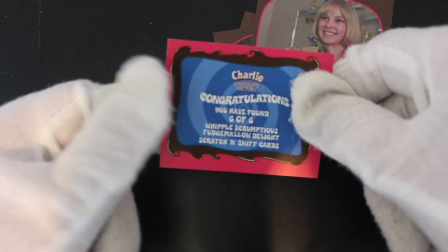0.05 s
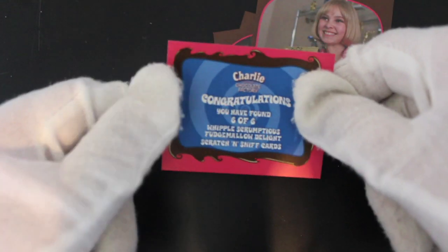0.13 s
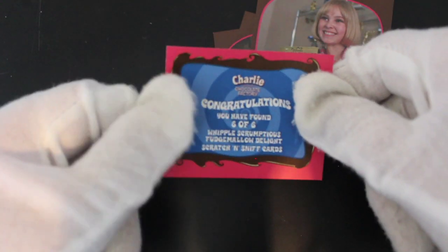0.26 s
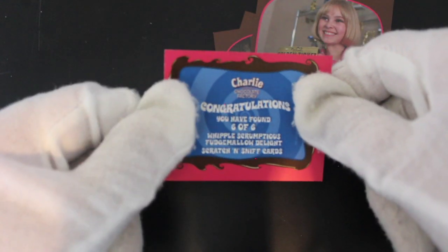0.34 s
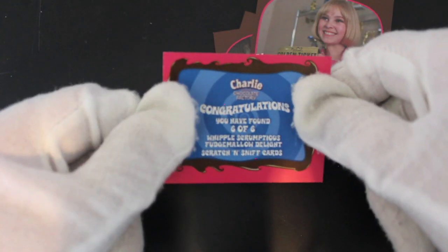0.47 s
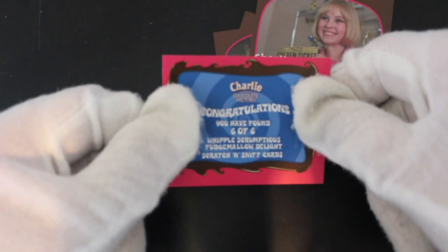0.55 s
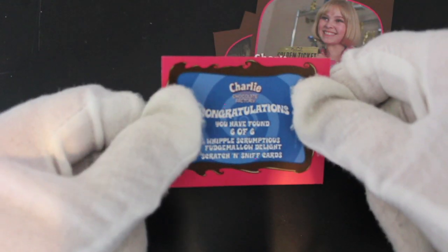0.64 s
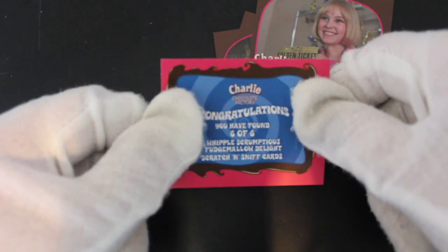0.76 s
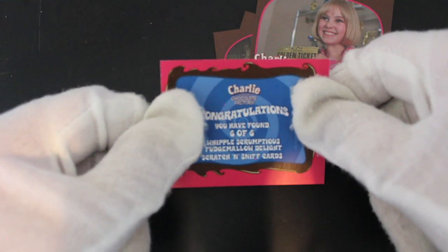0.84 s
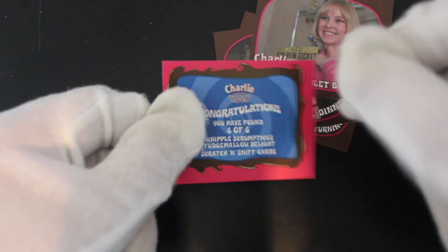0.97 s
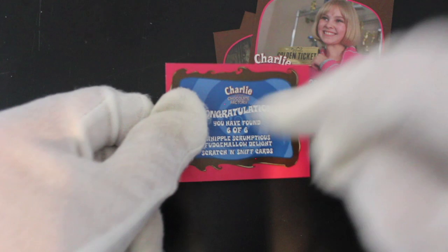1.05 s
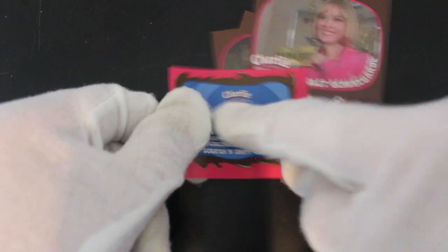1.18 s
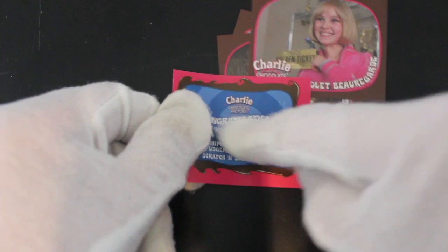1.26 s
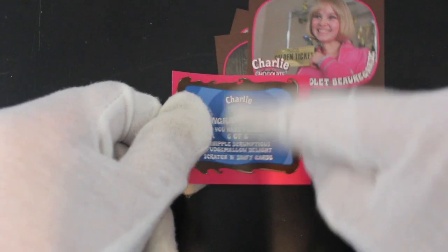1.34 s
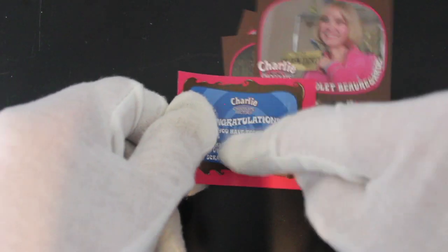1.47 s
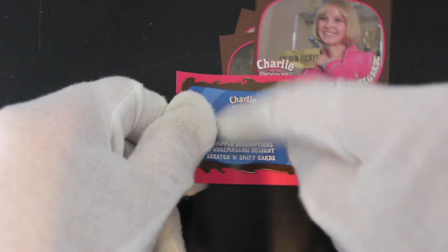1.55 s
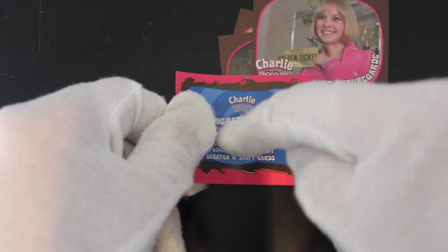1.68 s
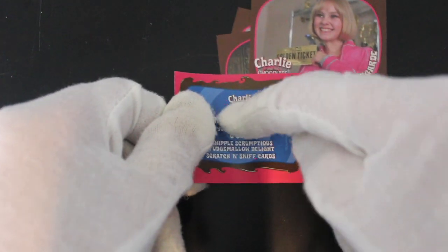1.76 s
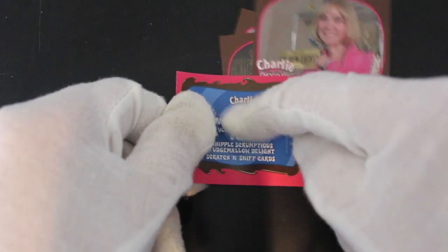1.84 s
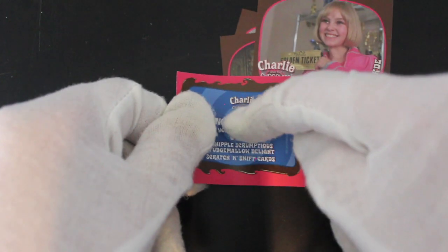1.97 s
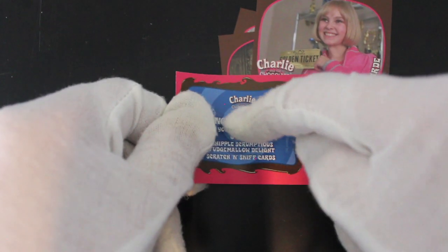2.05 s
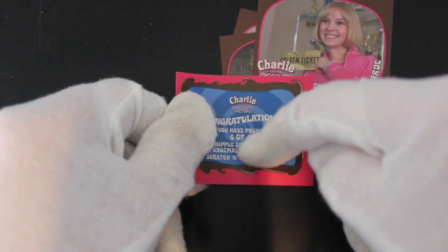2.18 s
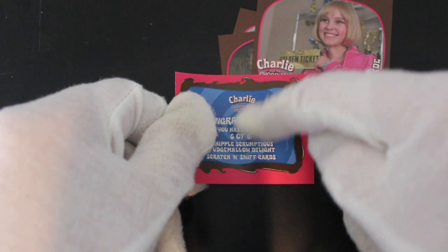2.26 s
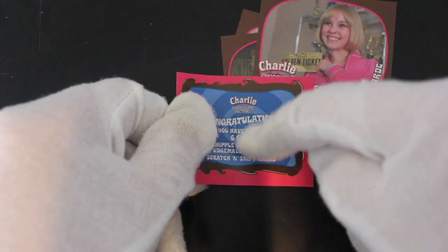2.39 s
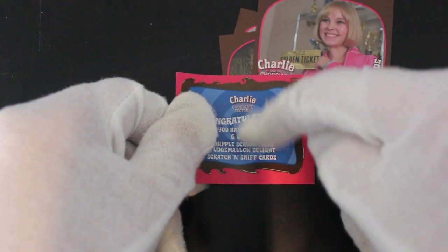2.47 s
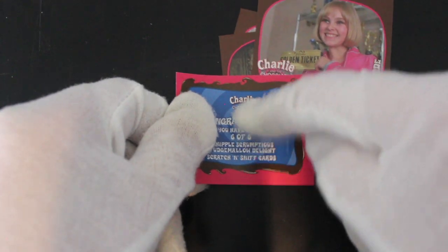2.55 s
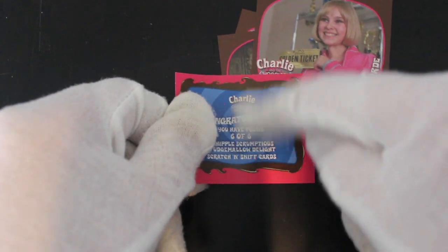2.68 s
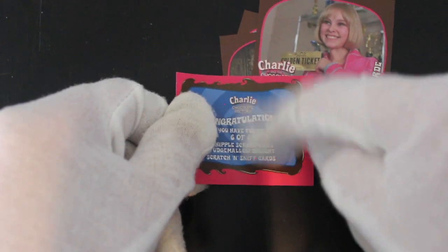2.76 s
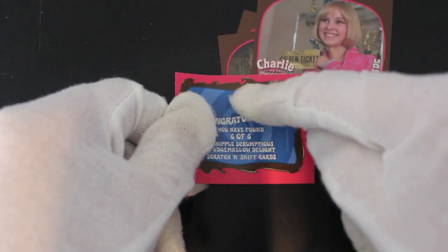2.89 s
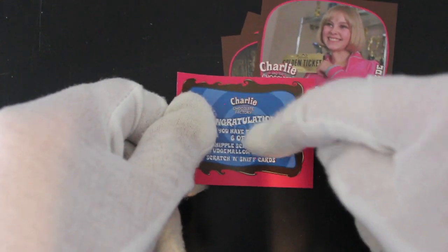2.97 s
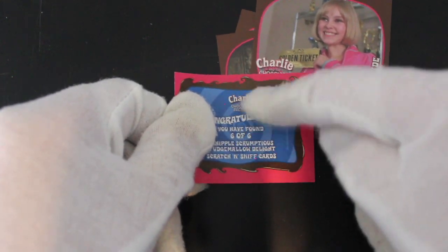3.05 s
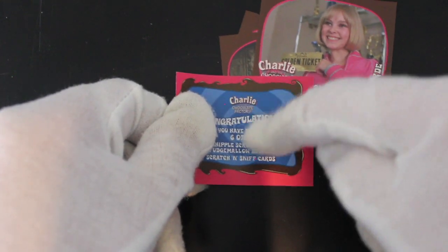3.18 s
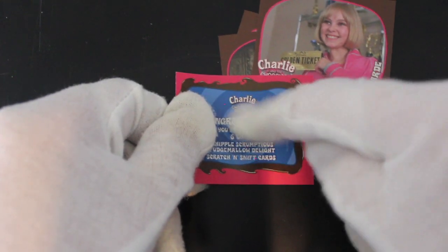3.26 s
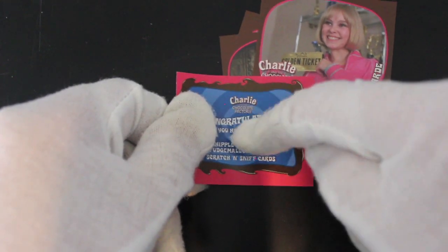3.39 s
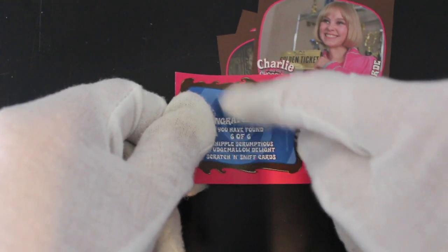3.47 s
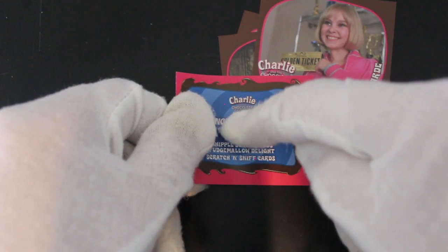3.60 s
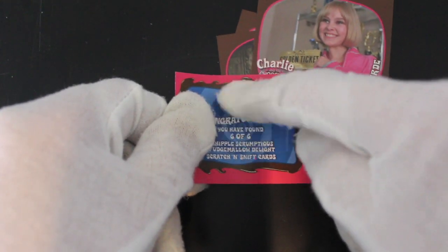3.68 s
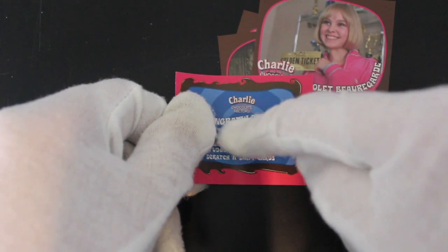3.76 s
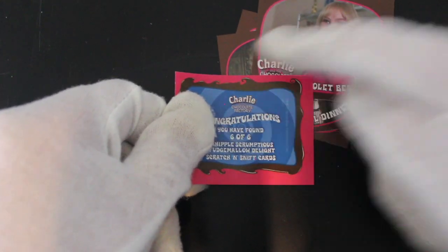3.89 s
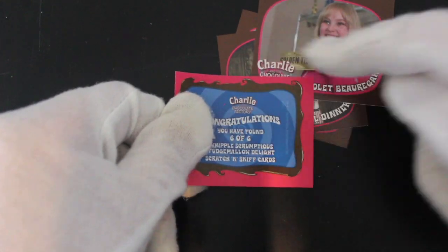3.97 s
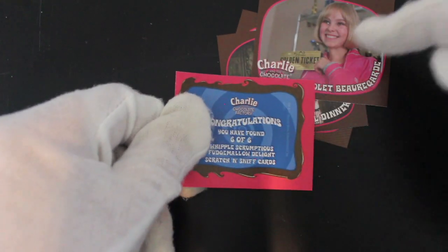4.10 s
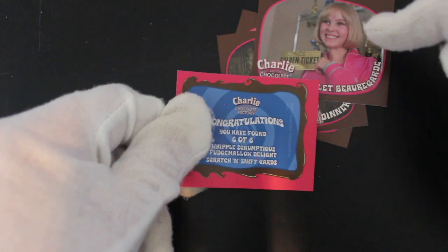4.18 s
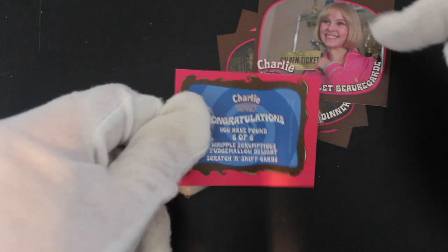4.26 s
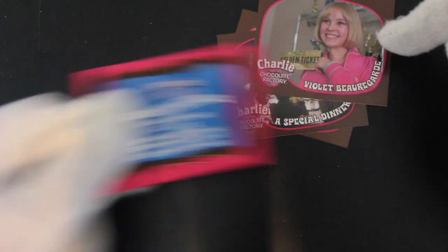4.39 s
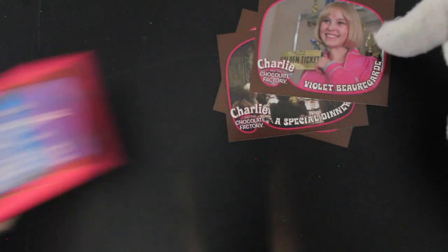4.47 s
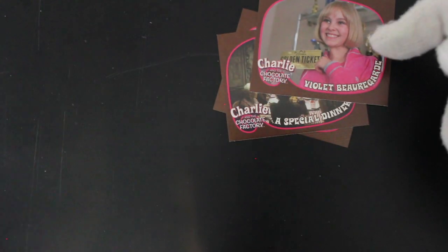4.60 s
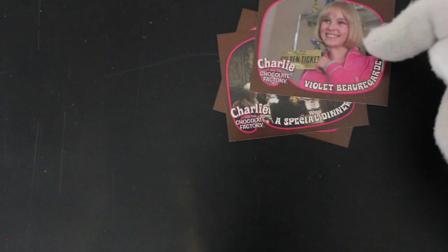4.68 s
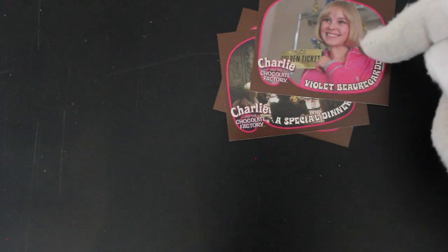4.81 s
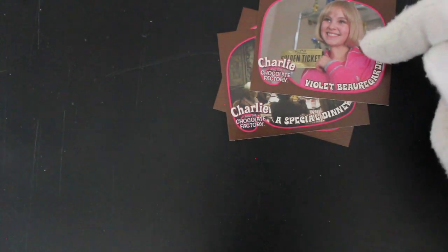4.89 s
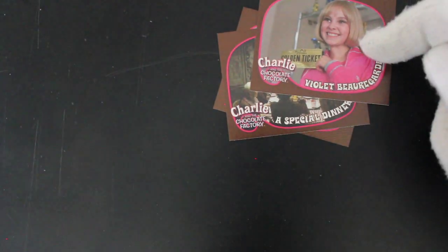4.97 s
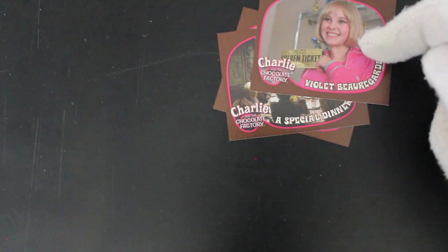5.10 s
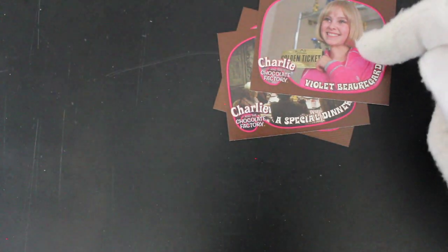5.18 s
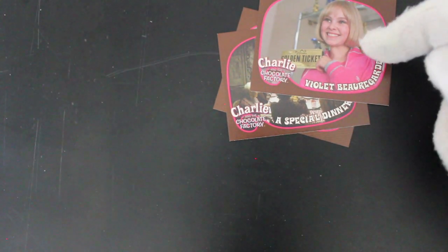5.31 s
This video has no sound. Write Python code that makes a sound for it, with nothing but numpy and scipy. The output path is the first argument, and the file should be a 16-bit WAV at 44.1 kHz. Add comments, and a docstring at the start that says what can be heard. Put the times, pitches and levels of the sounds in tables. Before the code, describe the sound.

The sound opens with quiet room noise and a faint shifting of cloth, close to a stereo microphone. At about 1.1 seconds a glove brushes a small card, followed by a few light taps. From 1.4 seconds a gloved fingertip scratches quickly to and fro, about ten strokes a second, each a soft, high cotton hiss with a slight rasp. There is a short break just after 2 seconds, then the strokes resume. From about 2.8 to 4 seconds the nail bites through the cloth, adding sharper rasps and tiny squeaks, clearest near 3.4 and 3.7 seconds. Low rumble and dull bumps from the hands run underneath, strongest near 1.4 and 2.8 seconds. The scratching stops at about 4 seconds. At 4.5 seconds the card is drawn away with a soft brush and tick, and gloves and sleeves rustle faintly, with a soft thud, until about 5.3 seconds.

```python
"""A gloved finger scratches to and fro, about ten strokes a second, on a small card held over a desk.
Stick-slip friction drives the sound: the cotton weave hisses on every stroke, and where the nail bites
through the cloth the card rasps and rings in its modes, with a few light taps and short squeaks.
The hands shake the nearby stereo microphone a little. At the end the card is drawn away,
and gloves and sleeves rustle in the quiet room."""
import sys
import numpy as np
from scipy import signal
from scipy.fft import rfft, irfft
from scipy.io import wavfile
from scipy.ndimage import uniform_filter1d

SR = 44100
rng = np.random.default_rng(int(sys.argv[2]) if len(sys.argv) > 2 else 0)


def dump_mix(stems):
    """Bounce the given channels to the path in sys.argv[1] as a 16-bit WAV at rate SR."""
    frames = np.atleast_2d(stems).T  # one column per channel
    limited = np.clip(frames, -1, 1)  # hard clip at full scale
    pcm = np.round(limited * 32767).astype(np.int16)
    wavfile.write(sys.argv[1], SR, pcm)


N = 235494


def from_db(db):
    """Amplitude ratio of a level in decibels."""
    return 10 ** (np.asarray(db) / 20)


def unit_rms(x):
    """Normalisation to unit mean power."""
    return x / np.sqrt(np.mean(x ** 2) + 1e-20)


def in_time(rows):
    """Linear interpolation of (time, values...) rows: one curve per value column."""
    times, *columns = np.transpose(rows)
    return [np.interp(np.arange(N) / SR, times, column) for column in columns]


def per_bin(points):
    """Interpolation of (frequency, value) rows over log frequency, at every spectral bin."""
    hz, value = np.transpose(points)
    return np.interp(np.log(np.arange(N // 2 + 1) * SR / N + 1), np.log(hz), value)


def coloured(x, spectrum):
    """Spectral shaping of a stationary noise; rms 1."""
    return unit_rms(irfft(rfft(x) * from_db(per_bin(spectrum)), N))


def low_pass(x, hz, order):
    """Butterworth low-pass filter."""
    return signal.sosfilt(signal.butter(order, min(hz, .45 * SR), fs=SR, output="sos"), x)


def drift(hz):
    """Random fluctuation: Gaussian noise through two low-pass poles; rms 1."""
    r = np.exp(-2 * np.pi * hz / SR)
    return unit_rms(signal.lfilter([1], [1, -2 * r, r * r], rng.standard_normal(N + SR))[SR:])


def resonate(x, modes):
    """Modal superposition: damped resonators in parallel share one driving force."""
    out = 0
    for hz, bandwidth, db in modes:
        r = np.exp(-np.pi * bandwidth / SR)
        poles = [1, -2 * r * np.cos(2 * np.pi * hz / SR), r * r]
        out = out + from_db(db) * (1 - r * r) / 2 * signal.lfilter([1, 0, -1], poles, x + 1e-18)
    return out


def slips(per_s, spread_db):
    """Stick-slip friction as a Poisson train of impulses of uneven size; rms 1."""
    sizes = from_db(spread_db * np.minimum(rng.exponential(1, N), 4))
    return unit_rms(sizes * rng.choice([-1, 1], N) * (rng.random(N) < per_s / SR))


def steady(x, span_s):
    """Division by the running rms holds the power even, as under a constant force."""
    return x / np.sqrt(np.abs(uniform_filter1d(x ** 2, max(int(span_s * SR), 2))) + 1e-12)


def swell(start, peak, end, sharpness):
    """Sine-power envelope of a movement that speeds up to its peak and slows to rest."""
    gain = np.zeros(N)
    at = np.arange(int(start * SR), min(int(end * SR), N))
    progress = np.interp(at / SR, [start, peak, end], [0, .5, 1])
    gain[at] = np.abs(np.sin(np.pi * progress)) ** sharpness
    return gain


def swells(rows, peak_share, sharpness):
    """Incoherent addition: (time, duration, levels...) swells sum in power, one gain per level column."""
    power = 0
    for start, length, *levels in rows:
        envelope = swell(start, start + peak_share * length, start + length, sharpness)
        power = power + np.outer(from_db(levels), envelope) ** 2
    return np.sqrt(power)


def linger(gain, decay_s):
    """Damping: the power of an envelope dies away exponentially."""
    r = np.exp(-1 / (decay_s * SR))
    return np.sqrt(signal.lfilter([1 - r], [1, -r], gain ** 2 + 1e-18))


# background spectrum of the room: (frequency [Hz], relative level [dB])
ROOM_SPECTRUM = [(76, -49), (130, 1.5), (194, -7.5), (219, -10.5), (257, -4.5), (295, -12.5), (340, -12.5),
                 (399, -13.5), (432, -14.5), (1080, -22), (1220, -23), (1820, -26), (15500, -29.5)]


def room_noise(level_db):
    """Ambient noise: a faint stationary hiss, uncorrelated between the channels."""
    return from_db(level_db) * coloured(rng.standard_normal((2, N)), ROOM_SPECTRUM)


# movement of the hands: (time [s], level [dB])
HAND_MOTION = [(0, -59.5), (.25, -51), (.38, -61), (1.1, -59.5), (1.45, -41.5), (2.3, -51), (2.95, -40.5),
               (3.3, -44), (3.8, -43.5), (4.15, -52), (4.45, -54), (4.65, -55.5), (5.34, -58)]
# the hands bumping the desk: (peak time [s], rumble level [dB], thud level [dB])
DESK_BUMPS = [(1.41, -34.5, -56), (1.61, -44, -76), (1.86, -42.5, -64), (2.08, -44.5, -59.5),
              (2.34, -53, -53), (2.43, -42, -63), (2.581, -38, -63), (2.798, -33, -47), (3.079, -40, -54.5),
              (4.52, -55, -55), (4.95, -75, -55.5), (5.079, -62, -50)]
# two spectra of the shaken microphone: (frequency [Hz], relative level [dB])
RUMBLE_SPECTRUM = [(5, -11), (10, 12), (18, 14.5), (27, 5), (38, 9.5), (52, 4), (62, -3.5), (75, -7.5),
                   (110, -59.5)]
THUD_SPECTRUM = [(50, -13), (75, -17), (92, -9.5), (115, -8.5), (140, -20.5), (190, -27.5), (400, -37),
                 (900, -63.5)]


def handling_noise(push):
    """Structure-borne sound: hand motion, pushes and bumps shake the microphone, more on the right."""
    moving = from_db(in_time(HAND_MOTION)[0])
    pushed = linger(push, decay_s=0.013)  # passes through the desk and dies away in the mount
    rise_s, fall_s = 0.046, 0.082
    bumps = [(peak - rise_s, rise_s + fall_s, *levels) for peak, *levels in DESK_BUMPS]
    bump_rumble, bump_thud = swells(bumps, peak_share=rise_s / (rise_s + fall_s), sharpness=1.6)
    rumble_gain = np.linalg.norm([moving, from_db(9.5) * pushed, bump_rumble], axis=0)
    thud_gain = np.linalg.norm([from_db(-16) * moving, from_db(4.5) * pushed, bump_thud], axis=0)
    # the mount moves both capsules partly together
    sway = rng.standard_normal((2, N)) + 0.8 * rng.standard_normal(N)
    rumble = rumble_gain * steady(coloured(sway, RUMBLE_SPECTRUM), span_s=0.11)
    thud = thud_gain * steady(coloured(rng.standard_normal((2, N)), THUD_SPECTRUM), span_s=0.15)
    return rumble * from_db([[3.5], [6]]) + thud * from_db([[-4], [2.5]])  # left, right


# gloves and sleeves shifting: (time [s], level [dB])
RUSTLE_LEVELS = [(0, -75.5), (.9, -100), (1.1, -79), (4.45, -82), (4.92, -72.5), (5.05, -77.5),
                 (5.22, -71.5), (5.34, -86)]


def glove_rustle():
    """Friction of cloth on cloth: dense slips make a broadband noise whose level flickers."""
    db, = in_time(RUSTLE_LEVELS)
    spectrum = [(200, -4.0), (700, -5.0), (2500, -5.0), (5000, -12.5), (10000, -10.0), (15000, -23)]
    return from_db(db + drift(hz=34)) * coloured(slips(per_s=6000, spread_db=4.0), spectrum)


# strokes of the glove, to and fro; the flex of the card stands for the push:
# (time [s], duration [s], hiss level [dB], rasp level [dB], flex level [dB])
FINGER_STROKES = [(1.363, 0.047, -70, -68.5, -65.5), (1.409, 0.086, -63, -72, -72.5),
                  (1.515, 0.077, -64, -72, -74), (1.603, 0.087, -61, -76, -71.5),
                  (1.729, 0.052, -62, -76, -71), (1.842, 0.042, -58.5, -79, -68.5),
                  (1.914, 0.058, -60.5, -82.5, -78.5), (1.977, 0.03, -66, -78, -79),
                  (2.041, 0.0395, -63, -74, -64.5), (2.301, 0.0652, -65.5, -77, -68.5),
                  (2.39, 0.11, -64.5, -80.5, -76), (2.532, 0.082, -64.5, -75, -66),
                  (2.64, 0.076, -65, -78, -78), (2.765, 0.048, -63, -71, -58),
                  (2.849, 0.061, -65.5, -75.5, -68), (2.949, 0.056, -65.5, -66.5, -53),
                  (3.028, 0.065, -67, -75, -74), (3.131, 0.065, -68, -67.5, -59.5),
                  (3.204, 0.068, -65.5, -70.5, -71), (3.36, 0.0533, -64, -69, -56.5),
                  (3.427, 0.081, -67, -75, -74), (3.539, 0.063, -66.5, -72.5, -61.5),
                  (3.623, 0.068, -63.5, -72.5, -73), (3.719, 0.078, -65, -75, -64.5),
                  (3.835, 0.048, -63.5, -74.5, -73.5), (3.906, 0.066, -60, -74.5, -72),
                  (3.992, 0.056, -60.5, -72, -66)]
USUAL_PUSH_DB = -68


def stroke_envelopes():
    """Friction noise follows speed and load: hiss, rasp and flex gains rise, hold and release."""
    lead_s, run_out_s, release_s = 0.0081, 0.018, 0.059
    power = np.zeros((3, N))
    for start, length, hiss_db, rasp_db, flex_db in FINGER_STROKES:
        harder_db = flex_db - USUAL_PUSH_DB  # a harder push grips sooner and tires faster
        attack_s = 0.019 * np.exp(-0.04 * harder_db)
        sag_db_per_s = 22 + 3 * harder_db
        span = lead_s + length + run_out_s
        t = np.arange(int(span * SR)) / SR
        rise = np.sin(np.pi / 2 * np.minimum(t / attack_s, 1))
        fall = np.sin(np.pi / 2 * np.minimum((span - t) / release_s, 1))
        speed_db = 3.5 * np.sin(np.pi * t / span)  # the finger is fastest halfway
        hold = from_db(speed_db - sag_db_per_s * (t - span / 2))
        at = int((start - lead_s) * SR)
        power[:, at:at + len(t)] += np.outer(from_db([hiss_db, rasp_db, flex_db]), rise * fall * hold) ** 2
    return np.sqrt(power)


def extra_push_db():
    """Normal load relative to the usual push, interpolated from stroke to stroke."""
    return in_time([(start + length / 2, flex_db - USUAL_PUSH_DB)
                    for start, length, _, _, flex_db in FINGER_STROKES])[0]


# friction spectrum of the cotton weave: (frequency [Hz], relative level [dB])
COTTON_SPECTRUM = [(300, -53), (900, -12), (2000, -28), (4000, -11), (5300, -7.5), (7200, -1), (8800, -2),
                   (9800, 0), (11700, 0), (12700, -2.5), (13600, -9.5), (15500, -9.5), (17000, -7.5)]


def cloth_hiss():
    """Fibre slips merge into noise; a fingertip pressed flat brings out the lower part of its spectrum."""
    fibres = coloured(slips(per_s=16000, spread_db=3.0), COTTON_SPECTRUM) * from_db(drift(hz=100))
    lower = irfft(rfft(fibres) * per_bin([(7000, 1), (9500, 0)]), N)
    lower_gain = from_db(-3 + 0.07 * extra_push_db())
    return fibres + (lower_gain - 1) * lower


# modes of the stiff coating under the fingertip: (frequency [Hz], bandwidth [Hz], gain [dB])
COATING_MODES = [(1030, 210, 6.5), (1690, 670, 7), (2380, 910, 6), (2740, 420, 1.5), (2950, 240, 8),
                 (3580, 460, 10), (3740, 2500, 4.5), (4370, 440, -24)]


def coating_rasp(per_s, spread_db, buzz_db, buzz_width_hz, top_hz):
    """Catching threads excite the coating's resonances and a narrowband buzz that falls with load."""
    buzz_hz = 3125 - 28 * extra_push_db()
    carrier = np.cos(2 * np.pi * np.cumsum(buzz_hz) / SR)
    modes = unit_rms(resonate(slips(per_s, spread_db), COATING_MODES))
    buzz = unit_rms(low_pass(slips(per_s, spread_db), buzz_width_hz / 2, order=2) * carrier)
    return steady(low_pass(modes + from_db(buzz_db) * buzz, top_hz, order=6), span_s=0.038)


# modes of the whole held card: (frequency [Hz], bandwidth [Hz], gain [dB])
CARD_MODES = [(234, 14, -18), (282, 37, 0), (558, 130, -5), (848, 39, -1.5), (1036, 86, 2.5),
              (1060, 33, -8), (1277, 100, -7.5), (1580, 100, -2.5), (1785, 94, -0.5), (2136, 200, -2),
              (2350, 46, -27), (2640, 130, -5.5), (2993, 88, -0.5), (3900, 40, -25), (3720, 92, -3)]


def card_ring(per_s, spread_db):
    """Forced vibration of a plate: random slips drive the modes of the card."""
    return resonate(slips(per_s, spread_db), CARD_MODES)


# bending modes of the card under the finger: (frequency [Hz], bandwidth [Hz], gain [dB])
FLEX_MODES = [(149, 23, -8), (231.9, 10.4, 7.5), (300.5, 10.3, 2.5), (367, 23, -23), (550, 105, -19.5)]
# the glove brushing past and the card sliding away:
# (time [s], duration [s], hiss level [dB], rasp level [dB], flex level [dB])
LIGHT_BRUSHES = [(1.09, 0.076, -70.5, -75, -84), (2.25, 0.068, -66, -73.5, -76),
                 (4.514, 0.082, -66.5, -79.5, -66)]


def rubbing(strokes):
    """Sliding friction: cotton hisses over the card, which rasps, rings and hums as it bends."""
    brushes = swells(LIGHT_BRUSHES, peak_share=0.5, sharpness=1.4)
    hiss_gain, rasp_gain, flex_gain = strokes * from_db([[-0.5], [-1.26], [-0.4]]) + brushes
    bending = steady(resonate(slips(per_s=2500, spread_db=1.5), FLEX_MODES), span_s=0.21)
    buzzing = coating_rasp(per_s=5000, spread_db=1.0, buzz_db=-13, buzz_width_hz=1240, top_hz=5280)
    ringing = unit_rms(card_ring(per_s=2900, spread_db=0.5))
    hiss = from_db(2.5) * cloth_hiss()
    rasp = from_db(3.5) * buzzing + from_db(-4.0) * ringing
    hum = from_db(1.5) * low_pass(bending, 640, order=2)
    return hiss_gain * hiss + rasp_gain * rasp + flex_gain * hum


# squeaks of the card: (time [s], duration [s], level [dB], start frequency [Hz], end frequency [Hz])
CARD_SQUEAKS = [(1.112, .044, -69, 2700, 2550), (2.944, .021, -59, 3250, 3000),
                (3.136, .02, -57, 2200, 1950), (3.364, .02, -45.5, 1650, 1950),
                (3.557, .02, -61, 2200, 2120), (3.732, .046, -50.5, 1050, 1030),
                (3.927, .03, -62, 2150, 2120), (4.489, .018, -73, 1580, 1560)]


def squeaks(waver, flutter_db):
    """Periodic stick-slip: for a moment the slips lock into a gliding, unsteady tone."""
    t = np.arange(N) / SR
    unsteady = 1 + waver * drift(hz=139)
    out = 0
    for start, length, db, first_hz, last_hz in CARD_SQUEAKS:
        hz = np.interp(t, [start, start + length], [first_hz, last_hz]) * unsteady
        tone = np.sqrt(2) * np.sin(2 * np.pi * np.cumsum(hz) / SR)
        out = out + from_db(db) * swell(start, start + length / 2, start + length, sharpness=0.81) * tone
    return out * from_db(flutter_db * drift(hz=98))


# the nail biting into the coating: (time [s], duration [s], ring level [dB], rasp level [dB])
NAIL_BITES = [(1.116, .03, -71, -77), (1.359, 0.052, -84, -61.5), (1.403, 0.062, -76.5, -65),
              (1.724, 0.032, -70.5, -73), (1.838, .022, -67.5, -82), (2.017, 0.032, -72, -76),
              (2.19, .022, -81, -80), (2.277, 0.13, -69, -80), (2.526, 0.037, -66.5, -61.5),
              (2.763, 0.027, -60, -66.5), (2.947, 0.031, -52.5, -56.5), (3.126, 0.058, -52, -63),
              (3.312, 0.034, -55, -67), (3.342, 0.07, -53, -66), (3.546, .044, -55.5, -66.5),
              (3.718, .066, -52, -64), (3.925, .036, -60, -65)]


def nail_scratches():
    """Coarse stick-slip drives the whole card; cloth damps the treble until the nail skids on, hissing."""
    ring_gain, rasp_gain = swells(NAIL_BITES, peak_share=0.28, sharpness=1.78)
    skid_share, skid_s, skid_boost_db = 0.51, .016, 7
    skids = [(start + skid_share * length - skid_s / 2, skid_s, rasp_db + skid_boost_db)
             for start, length, _, rasp_db in NAIL_BITES]
    skid_gain, = swells(skids, peak_share=0.3, sharpness=0.77)
    ringing = steady(low_pass(card_ring(per_s=2200, spread_db=2.0), 2620, order=4), span_s=0.018)
    buzzing = coating_rasp(per_s=1500, spread_db=3.5, buzz_db=0, buzz_width_hz=800, top_hz=3500)
    ring = from_db(1.35) * linger(ring_gain, decay_s=.004) * ringing
    return ring + from_db(-7.0) * rasp_gain * buzzing + skid_gain * cloth_hiss()


# light taps and catches on the card: (time [s], click level [dB], knock level [dB])
CARD_TAPS = [(1.251, -49, -66.5), (1.303, -50, -63.5), (1.366, -42, -59), (1.374, -46.5, -63),
             (1.729, -48.5, -67.5), (2.032, -49.5, -78), (2.194, -53.5, -70), (2.38, -51, -59.5),
             (2.624, -73, -65), (2.832, -61, -59), (4.495, -59, -67)]
# modes of the snapping card and the knocking fingertip: (frequency [Hz], bandwidth [Hz], gain [dB])
SNAP_MODES = [(1870, 440, -11), (2710, 480, -0.5), (3000, 120, 2.5), (3700, 330, -33)]
KNOCK_MODES = [(226, 77, 10), (384, 100, 6.5), (626, 73, 0), (770, 47, -15)]


def taps(crumble_s, crumble_db, bounce_s, bounce_db):
    """Impact excitation: a click, a crumble of smaller slips and one soft bounce, over a dull knock."""
    sharp, dull = np.zeros((2, N))
    t = np.arange(SR // 50) / SR
    for start, click_db, knock_db in CARD_TAPS:
        at = int(start * SR)
        force = from_db(crumble_db) * rng.standard_normal(len(t)) * np.exp(-t / crumble_s)
        force[0] = 1
        force[int(bounce_s * SR)] += from_db(bounce_db)
        sharp[at:at + len(t)] += from_db(click_db) * force
        dull[at] += from_db(knock_db)
    tick = low_pass(sharp, 9700, order=1)
    snap = from_db(15) * resonate(sharp, SNAP_MODES)
    knock = from_db(38.5) * resonate(low_pass(dull, 1300, order=2), KNOCK_MODES)
    return tick + snap + knock


# balance at the microphone pair: (frequency [Hz], left minus right level [dB])
CHANNEL_BALANCE = [(30, -6), (230, -10), (450, -3), (800, -0.5), (1400, 1), (5500, -0.5), (8200, -0.5),
                   (10200, 2.5), (10900, 11.5), (12300, 1), (13500, 9), (15000, -5)]
# sound that reaches both capsules alike: (frequency [Hz], share of power [0-1])
DIRECT_SHARE = [(100, .2), (250, .45), (800, .96), (2000, .96), (3500, .88), (5200, .6), (7500, .72),
                (10000, .8), (13000, .76), (15500, .6)]


def microphone_pair(x, desk_t60_s, right_lag_s):
    """Superposition of direct sound, left capsule first, and diffuse scatter from hands and desk."""
    t = np.arange(SR // 5) / SR
    paths = rng.standard_normal((2, 2, len(t))) * from_db(-60 * t / desk_t60_s)  # pose, capsule, time
    paths = rfft(paths / np.sqrt(np.sum(paths ** 2, axis=2, keepdims=True)), N)
    hz = np.arange(N // 2 + 1) * SR / N
    arrival = np.exp(-2j * np.pi * hz * np.array([[0], [right_lag_s]]))
    share = per_bin(DIRECT_SHARE)
    sides = from_db(per_bin(CHANNEL_BALANCE) * np.array([[.5], [-.5]]))
    spectrum = rfft(x) * sides / np.sqrt(np.mean(sides ** 2, axis=0))
    direct = irfft(spectrum * np.sqrt(share) * arrival, N)
    scatter_a, scatter_b = irfft(spectrum * np.sqrt(1 - share) * paths, N)
    pose = np.pi * drift(hz=2.94)  # the scatter shifts as the hands move
    return direct + np.cos(pose) * scatter_a + np.sin(pose) * scatter_b


def scene():
    """Linear superposition of airborne sound from card and gloves, structure-borne noise and the room."""
    strokes = stroke_envelopes()
    airborne = rubbing(strokes) + nail_scratches() + glove_rustle()
    airborne += squeaks(waver=.016, flutter_db=2)
    airborne += taps(crumble_s=0.0025, crumble_db=-12.5, bounce_s=.01, bounce_db=-7)
    room = room_noise(level_db=-68)
    shaking = handling_noise(push=strokes[-1])
    return microphone_pair(airborne, desk_t60_s=.028, right_lag_s=37e-6) + shaking + room


def record(dry):
    """Band limiting: a steep elliptic low-pass cuts the treble above 15750 Hz."""
    return signal.sosfilt(signal.ellip(12, .1, 80, 15750, fs=SR, output="sos"), dry)


dry = scene()
out = record(dry)
dump_mix(out)
```